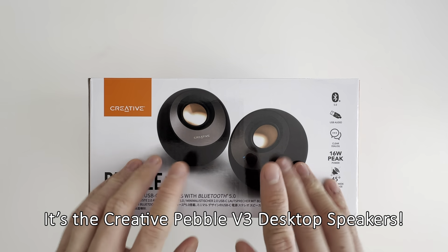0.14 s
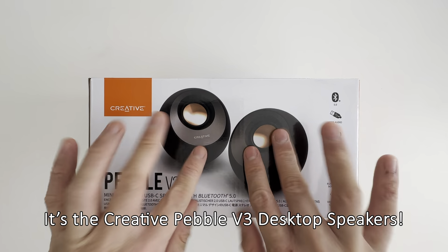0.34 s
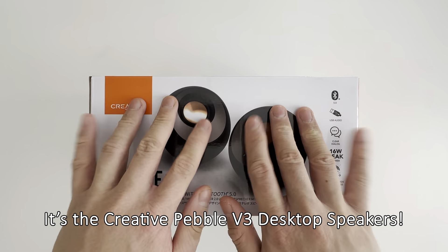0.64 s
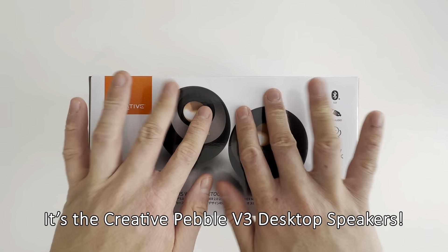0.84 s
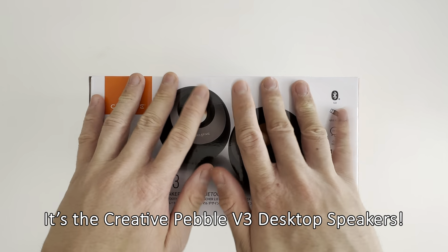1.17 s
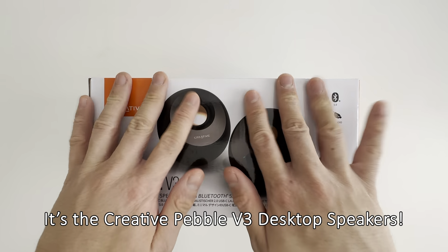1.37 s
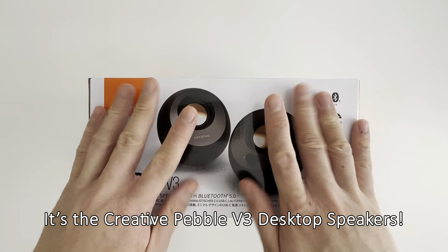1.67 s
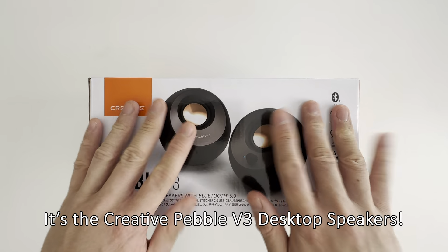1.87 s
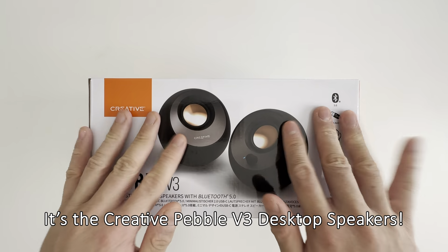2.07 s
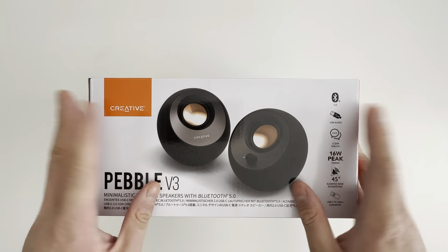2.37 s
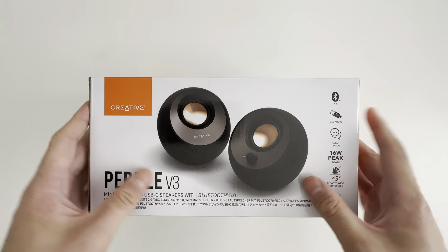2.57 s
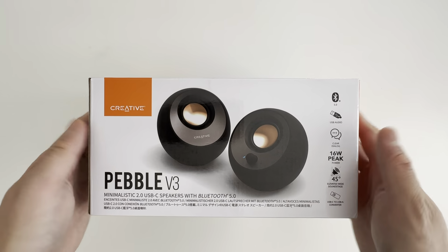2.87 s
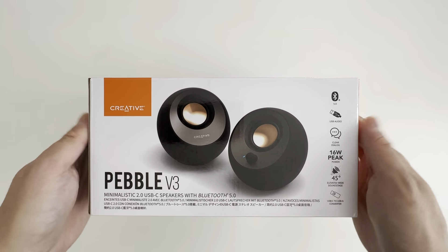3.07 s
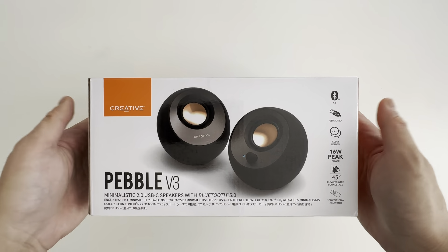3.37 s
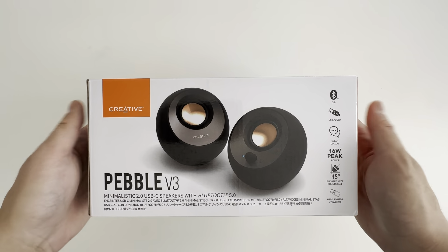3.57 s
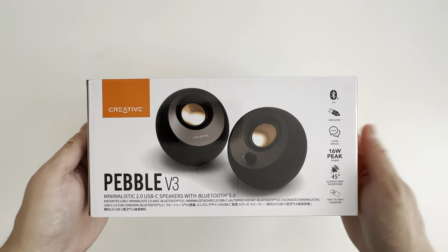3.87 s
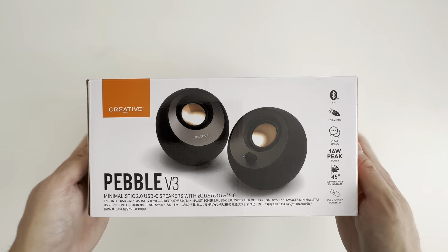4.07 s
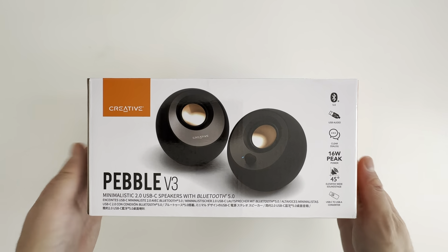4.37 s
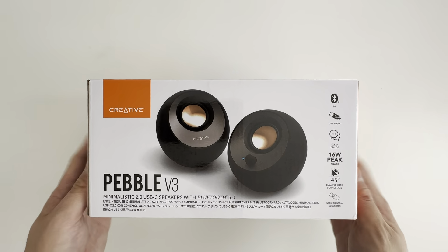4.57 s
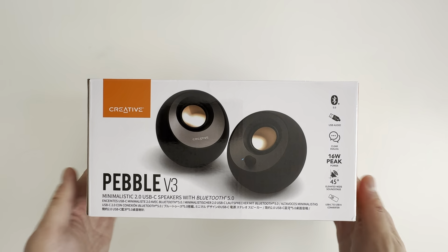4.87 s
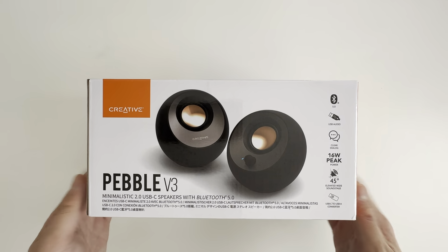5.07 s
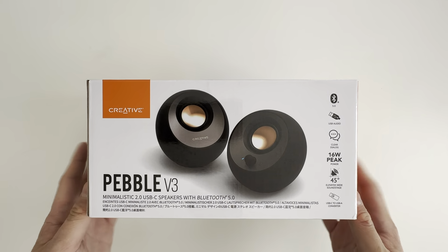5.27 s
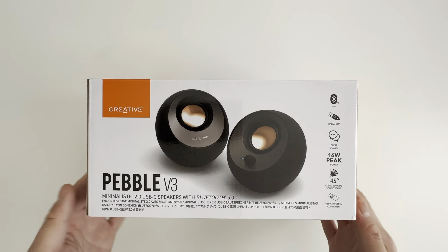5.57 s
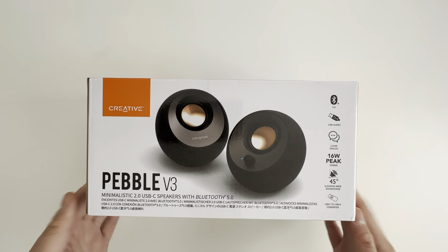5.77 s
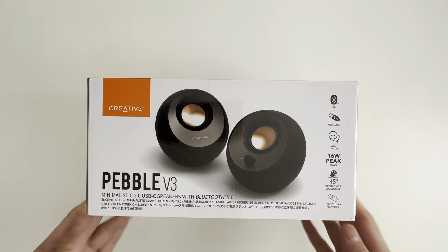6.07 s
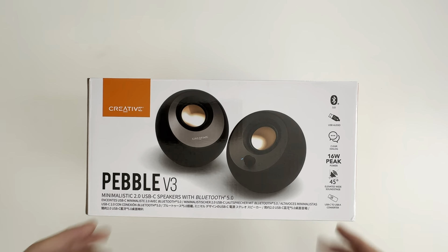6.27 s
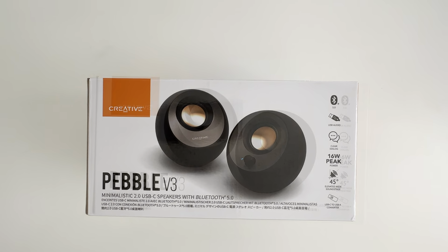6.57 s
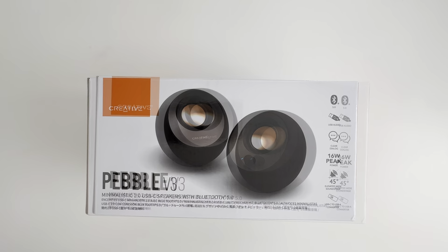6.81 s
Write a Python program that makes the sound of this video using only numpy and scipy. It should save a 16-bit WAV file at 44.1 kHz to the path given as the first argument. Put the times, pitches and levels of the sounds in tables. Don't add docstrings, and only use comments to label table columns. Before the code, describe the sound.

Fingertips of both hands drum rapidly and unevenly on a cardboard box, hollow low thumps easing into lighter, higher pats on its ends.

```python
import sys
import numpy as np
from scipy import signal
from scipy.fft import rfft, irfft, next_fast_len
from scipy.io import wavfile
from scipy.ndimage import map_coordinates

SR = 44100
rng = np.random.default_rng(int(sys.argv[2]) if len(sys.argv) > 2 else 0)


def boost(x):
    u = np.asarray(x, float) / 20
    return 10 ** u


def digitize_waveform(pressure):
    field = np.atleast_2d(pressure).T
    bounded = np.clip(field, -1, 1)
    quanta = np.round(bounded * 32767).astype(np.int16)
    wavfile.write(sys.argv[1], SR, quanta)


N = 306054
SPAN = next_fast_len(N + SR // 2)
HZ = np.fft.rfftfreq(SPAN, 1 / SR)
CLOCK = np.arange(N) / SR
T = np.arange(int(.13 * SR)) / SR


def on_log(table):
    hz, value = np.transpose(table)
    return np.interp(np.log(HZ + 1), np.log(hz), value)


def shaped(x, gain):
    return irfft(rfft(x, SPAN) * gain, SPAN)[..., :N]


def bell(hz, width_hz):
    return 1 / (1 + (2 * (HZ - hz) / width_hz) ** 2)


def decay(t, t60):
    return np.exp(-np.log(1000) * t / t60)


# frequency in Hz, level in dB per Hz.
AIR_SPECTRUM = [(41, -19.5), (70, -4.5), (97, -17.5), (113, -14.5), (183, -26), (680, -41.5), (1310, -37.5),
                (1780, -44), (2210, -32), (2750, -47.5), (6000, -47.5), (7200, -41), (7900, -43.5),
                (9400, -47.5), (10300, -59.5), (13200, -57.5)]


def air(level_db=-68.5, fan_hz=85, fan_db=-85):
    gain = boost(on_log(AIR_SPECTRUM)) / (1 + (HZ / 14300) ** 60)
    apart = np.clip(HZ / 300, .25, 1.1)
    mid, side = rng.standard_normal((2, N))
    mid, side = shaped(mid, gain), shaped(side, gain * apart)
    noise = np.array([mid + side, mid - side]) / mid.std()
    return boost(level_db + 1.5) * noise + boost(fan_db) * np.sin(2 * np.pi * fan_hz * CLOCK)


# time in seconds, level in dB.
TABLE_HUM_LEVEL = [
    (0, -46),
    (.2, -54.5),
    (.5, -44.5),
    (1.2, -53.5),
    (2.3, -49),
    (2.7, -55),
    (3.6, -65.5),
    (5.9, -58),
    (6.4, -71.5),
]


def table_top(notes, mode_hz=57, width_hz=11, struck_db=-12):
    mode = 1 / (1 + 2j * (HZ - mode_hz) / width_hz)
    hum = shaped(rng.standard_normal((2, N)), mode ** 2)
    hum = (hum[0] + 0.17 * np.array([hum[1], -hum[1]])) / hum.std()
    s, db = np.transpose(TABLE_HUM_LEVEL)
    port_db = np.array([[-1.5], [1.5]])
    push = notes ** 2 / (np.abs(notes) + 0.011)
    return shaped(push, mode ** 2 * boost(struck_db)) + hum * boost(np.interp(CLOCK, s, db) + port_db)


def panel_note(hz, hold_s, air_db, air_hz, rise_s, sag_s, sag, sweep_s):
    pitch = hz * (1 + sag * np.exp(-T / sag_s)) + 2600 * np.exp(-T / sweep_s)
    ring = (1 - np.exp(-T / rise_s)) ** 2 * decay(T, 0.1)
    damping = 0.11 + 0.81 / (1 + np.exp(np.clip((T - hold_s) / 0.0007, -50, 50)))
    panel = ring * damping * np.sin(2 * np.pi * np.cumsum(pitch) / SR)
    boom = (1 - np.exp(-T / 0.0063)) ** 2 * decay(T, 0.079) * np.sin(2 * np.pi * air_hz * T)
    return panel + boost(air_db) * boom


def burst(rise_s, fast_s, slow_s, slow_db):
    return (1 - np.exp(-T / rise_s)) * (np.exp(-T / fast_s) + boost(slow_db) * np.exp(-T / slow_s))


def spot(noise, hz):
    return noise + 1.55 * signal.lfilter(*signal.iirpeak(hz, 4, SR), noise)


def landings(spots, settle, widen):
    rows = []
    for strokes, places in spots:
        for (s, knock_db, panel_db, click_db), (hz, ring_hz, pan_db) in zip(strokes, places):
            rows.append((s, knock_db, panel_db, settle * hz, click_db, widen * pan_db, ring_hz))
    return rows


def taps(rows, sag, sweep_s, push_s, sag_s, hold_s, note_db, air_db, air_hz, rattle_db, skin_db,
         lag_s, lag_s_per_db, alike=0.21):
    layers = np.zeros((3, 2, N + 2 * len(T)))
    knock_shape = burst(0.00083, 0.0018, 0.024, rattle_db)
    click_shape = burst(0.00069, 0.0013, 0.029, skin_db)
    contact = 1.02 * np.exp(-((T - 0.0007) / 0.00004) ** 2)
    for s, knock_db, panel_db, hz, click_db, pan_db, spot_hz in rows:
        noise = rng.standard_normal((4, len(T)))
        soft = (200 / hz) ** 0.704
        rise_s = push_s * soft * boost(0.069 * np.clip(panel_db - knock_db, -10, 12))
        held_s = hold_s * soft * boost(1.8 * noise[0, 0])
        boom_hz = air_hz * boost(1.2 * noise[3, 0])
        note = panel_note(hz, held_s, air_db, boom_hz, rise_s, sag_s, sag, sweep_s)
        bloom_s = 0.009 * max(soft - 1, 0) * np.clip((-14 - panel_db) / 7, 0, 1)
        note = np.roll(note, int(SR * bloom_s))
        jerks = np.repeat(noise[2, :len(T) // 100 + 1], 100)[:len(T)]
        lumps = boost(3.5 * jerks * (T > .004))
        lag = lag_s - lag_s_per_db * pan_db
        together = slice(int(s * SR), int(s * SR) + len(T))
        for port, sign in enumerate((1, -1)):
            start = int((s + max(sign * lag, 0)) * SR)
            here = slice(start, start + len(T))
            near = boost(min(sign * pan_db, 0))
            grain = np.sqrt(alike) * noise[0] + np.sqrt(1 - alike) * noise[1 + port] + contact
            skin = noise[3] + .5 * noise[1 + port]
            layers[0, port, here] += near * boost(panel_db + note_db) * note
            layers[1, port, here] += near * boost(knock_db) * knock_shape * lumps * spot(grain, spot_hz)
            layers[2, port, together] += boost(click_db + sign * pan_db / 4) * click_shape * lumps * skin
    return layers[:, :, :N]


# start in seconds, knock peak in dB, panel note in dB, skin click in dB.
LID_RIM_TAPS = [(.32, -24.5, -16.5, -41.5), (.57, -26, -15, -36), (.585, -14, -21, -34.5),
                (.812, -20.5, -19, -36), (.825, -11, -16, -58), (1.065, -25.5, -19, -34.5),
                (1.078, -12.5, -21, -37), (1.148, -25, -62, -40), (1.317, -13, -51.5, -49.5),
                (1.327, -29, -61, -53), (1.553, -13, -18.5, -35), (2.226, -12.5, -16, -32.5),
                (2.323, -25.5, -59, -53), (2.401, -23.5, -61, -53)]
LID_RIGHT_TAPS = [(.025, -24, -18, -45.5), (.076, -16.5, -19.5, -39), (.527, -55, -30, -62.5),
                  (.605, -25, -29, -62), (.851, -38, -46, -64), (.869, -26.5, -34.5, -48),
                  (.905, -17.5, -17.5, -42), (1.001, -26.5, -28, -51.5), (1.167, -19.5, -21, -70),
                  (1.198, -20, -24, -41), (1.343, -34, -24.5, -46), (1.401, -29, -22.5, -49),
                  (1.433, -27.5, -28, -53.5), (1.469, -27.5, -20.5, -63), (1.591, -21.5, -24, -57),
                  (1.634, -19, -18.5, -38.5), (1.818, -16, -18.5, -51), (1.944, -20.5, -23, -38),
                  (2.057, -18.5, -26.5, -38.5), (2.095, -20.5, -22.5, -48), (2.166, -20.5, -19.5, -34),
                  (2.176, -32, -43, -51), (2.244, -8, -18.5, -43), (2.276, -31, -36, -77),
                  (2.39, -23, -25, -40.5)]
LID_MIDDLE_TAPS = [(.003, -26, -40, -55), (.238, -42, -64, -51.5), (.361, -16.5, -18.5, -40),
                   (.4, -18.5, -18, -37), (.437, -11.5, -27.5, -48), (.495, -16, -47.5, -54),
                   (.505, -44, -22.5, -39), (.649, -21.5, -30, -40.5), (.687, -21, -25, -37.5),
                   (.734, -20, -19.5, -41), (.939, -21, -23, -40), (.985, -20, -19, -37.5),
                   (1.228, -26, -26, -45), (1.256, -23, -20, -42.5), (1.309, -17.5, -18.5, -30.5),
                   (1.58, -30, -27, -33.5), (1.712, -24, -17.5, -45), (1.785, -8.5, -13, -29.5),
                   (1.859, -21.5, -17, -54.5), (1.915, -22, -24.5, -34.5), (2.003, -10, -10.5, -31.5),
                   (2.136, -25, -58, -42.5)]
LID_LEFT_TAPS = [(.058, -26, -23.5, -44), (.114, -20, -45, -39.5), (.259, -38, -37, -45),
                 (.418, -14.5, -25, -71.5), (1.11, -22.5, -25, -33), (1.457, -12, -17.5, -33.5),
                 (1.697, -16.5, -18, -31.5), (1.803, -13.5, -18, -29.5), (2.038, -21.5, -28, -46),
                 (2.153, -17, -22.5, -37.5), (2.253, -16, -38, -34), (2.349, -28, -26, -36)]
# panel note in Hz, ring of the struck spot in Hz, left minus right in dB.
LID_RIM_PLACES = [(242, 860, -7), (233, 620, -7.0), (233.6, 700, -4.5), (223, 680, 3), (235, 540, -7),
                  (208, 580, -6), (235, 3900, -5.5), (263, 1600, -4), (179, 1300, -4.5), (220, 990, -17.5),
                  (230, 1270, -2.5), (214, 440, -0.5), (215, 1400, 2.5), (230, 2100, -2)]
LID_RIGHT_PLACES = [(161, 610, -9), (155.5, 560, -7), (153, 1140, -4.5), (162, 1600, -18),
                    (135, 1100, -9.5), (191, 1360, -1), (130, 1100, -6), (169, 1500, -6.5),
                    (156.6, 203, -8), (176, 440, -8), (175, 1300, -9.5), (163.3, 400, -7.5),
                    (177, 1500, -3.5), (159, 1340, -2), (180.2, 3100, -7.5), (169, 410, -7),
                    (162, 1200, -4), (167, 1200, -4.5), (156, 430, -8.5), (161, 5000, -7.5),
                    (167, 530, -7.5), (126, 1340, -7), (164, 630, -10), (166.4, 710, -13),
                    (155, 1400, -6.5)]
LID_MIDDLE_PLACES = [(178, 1170, -4), (156, 1100, 0), (173.3, 620, -8), (138, 710, -6), (154, 800, -8),
                     (126.2, 1440, -12), (165, 1600, -8), (198, 1100, -2.5), (178.4, 1230, -5),
                     (142.4, 180, -8.5), (170.4, 5500, -11.5), (156.6, 670, -4), (151.4, 440, -5),
                     (163, 610, -4), (163, 1800, -3), (156, 1000, -5), (165, 3500, -11.5), (187, 580, -5),
                     (167, 2000, -6.5), (162, 1600, -6), (163.7, 1200, -2), (173.5, 2600, 3)]
LID_LEFT_PLACES = [(180, 540, -3), (202, 1220, -6), (154, 1000, -5.5), (200, 610, -7), (126, 1150, -9),
                   (141.2, 1300, -8), (161, 1200, -4), (163.5, 970, -10), (157, 1100, -1.5),
                   (153, 1440, -2), (129, 1900, 2.5), (161, 2200, 0.5)]


def lid_taps():
    spots = [(LID_RIM_TAPS, LID_RIM_PLACES), (LID_RIGHT_TAPS, LID_RIGHT_PLACES),
             (LID_MIDDLE_TAPS, LID_MIDDLE_PLACES), (LID_LEFT_TAPS, LID_LEFT_PLACES)]
    return taps(landings(spots, settle=0.881, widen=0.91),
                sag=0.9, sweep_s=0.00128, push_s=0.0029, sag_s=0.0035, hold_s=0.011,
                note_db=5.0, air_db=-7, air_hz=122.4, rattle_db=-17.0, skin_db=-23.5,
                lag_s=0.00036, lag_s_per_db=.00001)


# frequency in Hz, gain in dB.
CARD_SPECTRUM = [(200, 8.5), (400, 4), (600, 5.5), (1500, 6), (2400, -2), (6000, -8.5), (9300, 0.5),
                 (10100, -12.5), (12500, -23.5), (15500, -15.5)]
# frequency in Hz, width in Hz, height in dB.
CARD_RESONANCES = [(833, 46, 3.5), (1183, 43, 4), (1368, 44, 3.5), (8090, 2040, -13.5)]
PORT_TURNS_HZ = 8600, 10300, 14000
PORT_TURN = sum(np.pi / 2 + np.arctan((HZ - hz) / 150) for hz in PORT_TURNS_HZ)


def card(layers, knock_db=-4, click_db=16.5, split_hz=5500):
    notes, knocks, clicks = layers
    colour = on_log(CARD_SPECTRUM) + sum(db * bell(hz, width) for hz, width, db in CARD_RESONANCES)
    low = 1 / np.sqrt(1 + (HZ / split_hz) ** 6)
    high = np.sqrt(1 - low ** 2)
    ports = np.array([np.ones_like(HZ), boost(-5.5) * np.exp(-1j * PORT_TURN)])
    knock = shaped(knocks, boost(colour + knock_db) * low)
    click = shaped(clicks, boost(colour + click_db) * high * ports)
    return notes + knock + click


# frequency in Hz, decay time T60 in seconds.
ROOM_DECAY = [(100, 0.78), (400, 0.19), (1500, 0.31), (5000, 0.38), (16000, 0.052)]
# frequency in Hz, level in dB.
ROOM_TINT = [(100, -1.5), (400, 8), (1500, -3.5), (5000, -1), (16000, 9)]


def room(x, wet_db=-33, first_s=0.000066):
    t = np.arange(SR // 2) / SR
    onset = 1 - np.exp(-t / first_s)
    decay_hz, decay_s = np.transpose(ROOM_DECAY)
    tail = 0
    for hz in 60 * 2 ** np.arange(0, 8.5, .5):
        band = np.exp(-.5 * (np.log2((HZ + 1) / hz) / .25) ** 2)
        t60 = np.interp(np.log(hz), np.log(decay_hz), decay_s)
        noise = rng.standard_normal((3, len(t)))
        apart = min(hz / 870.0, 1)
        pair = np.sqrt(1 - apart) * noise[0] + np.sqrt(apart) * noise[1:]
        tail = tail + band * rfft(pair * onset * decay(t, t60), SPAN)
    return shaped(x.mean(0), tail * boost(on_log(ROOM_TINT) + wet_db))


def stirred(tail, stir_s=.0008, stir_hz=.6):
    i = np.arange(N)
    late = stir_s * SR * np.sin(np.pi * stir_hz * i / SR) ** 2
    return np.array([map_coordinates(port, [i - late], mode="nearest") for port in tail])


# start in seconds, level in dB.
NAIL_TICKS = [(0.4366, -29.5), (0.4938, -40.5), (0.5227, -42), (0.902, -35), (1.1026, -37.5),
              (1.164, -46.5), (1.3966, -42.5), (1.555, -36.5), (1.604, -40), (1.712, -33), (1.8193, -43),
              (1.8284, -43.5), (2.4004, -37.5), (4.8853, -33), (3.024, -46.5), (3.3337, -29), (3.3727, -33),
              (3.6314, -38), (4.9046, -40.5), (5.1362, -38.5), (5.391, -37), (5.465, -62), (6.0166, -42.5)]
# start in seconds, level in dB.
MORE_NAIL_TICKS = [
    (.4184, -41),
    (1.1893, -41.5),
    (1.791, -27.5),
    (4.467, -38),
]


def nails(tick_db=1, low_hz=1500, fall_hz=4800, alike=0.94):
    out = np.zeros((2, N + len(T)))
    shape = burst(0.0001, 0.0008, 0.006, -24.0)
    for s, db in list(NAIL_TICKS) + list(MORE_NAIL_TICKS):
        noise = rng.standard_normal((3, len(T)))
        start = int(s * SR)
        out[:, start:start + len(T)] += boost(db + tick_db) * shape * (alike * noise[0] + noise[1:])
    rise = 1 + (low_hz / (HZ + 1)) ** 4
    fall = 1 + (HZ / fall_hz) ** 4
    return shaped(out[:, :N], 2 / np.sqrt(rise * fall))


def rub(at_s=2.385, length_s=.025, hz=4600, level_db=-50):
    band = np.exp(-.5 * (np.log2((HZ + 1) / hz) / 0.64) ** 2)
    hiss = shaped(rng.standard_normal((2, N)), band)
    stroke = np.exp(-.5 * ((CLOCK - at_s) / length_s) ** 2)
    return boost(level_db) * hiss / hiss.std() * stroke


# start in
# seconds, knock peak in dB, panel note in dB, skin click in dB.
END_SLACK_TAPS = [(2.519, -28.5, -27, -41.5), (2.551, -30.5, -44.5, -58), (2.557, -33, -28, -51),
                  (2.723, -26.5, -35.5, -39), (2.792, -37, -50, -67), (2.811, -52.5, -58.5, -46.5),
                  (2.876, -25, -27.5, -44.5), (3.014, -41, -39.5, -49), (3.148, -22, -25.5, -49.5),
                  (3.412, -22, -17.5, -52), (3.952, -26.5, -36, -41.5), (4.292, -28.5, -33, -43.5),
                  (4.683, -22, -33, -44), (4.752, -29, -39.5, -44.5), (4.771, -29.5, -34.5, -41.5),
                  (4.983, -24.5, -37, -35.5), (5.131, -24.5, -34, -39), (5.225, -32.5, -39.5, -41),
                  (5.249, -39, -43, -47), (5.466, -34, -36, -40), (5.673, -32.5, -36.5, -38.5)]
END_RIGHT_TAPS = [(2.488, -33, -36.5, -67), (2.605, -25.5, -23.5, -42.5), (2.902, -14.5, -13.5, -41.5),
                  (2.924, -23, -20, -41), (2.931, -54, -22, -47.5), (3.133, -24.5, -30, -50),
                  (3.179, -18.5, -17.5, -49), (3.21, -31, -21.5, -40), (3.345, -24.5, -62, -38),
                  (3.373, -18.5, -23.5, -36), (3.635, -21.5, -20.5, -37), (3.654, -34, -26.5, -49.5),
                  (3.804, -22.5, -31.5, -36), (3.851, -34.5, -37, -59), (4.121, -28, -37.5, -53.5),
                  (4.164, -27, -40, -47), (4.217, -29.5, -24, -51), (4.379, -22.5, -23, -51),
                  (4.396, -25.5, -26, -66), (4.613, -19.5, -22.5, -52), (4.656, -22.5, -32, -38),
                  (4.892, -23.5, -27.5, -40), (4.906, -21.5, -50, -45), (4.927, -61, -37, -64),
                  (5.164, -27.5, -27, -41.5), (5.391, -29, -28, -54.5), (6.025, -29, -73, -49.5)]
END_LEFT_TAPS = [(3.331, -22, -25.5, -40), (3.467, -23.5, -34.5, -37), (3.826, -36, -45, -44.5),
                 (3.937, -27.5, -28, -52), (4.13, -41, -35, -56), (4.172, -25.5, -27.5, -48.5),
                 (4.52, -24, -34, -43), (4.626, -24.5, -26, -39.5), (4.664, -21, -35, -45),
                 (4.852, -23.5, -20.5, -37), (5.095, -21.5, -21, -38), (5.335, -22.5, -29.5, -42),
                 (5.6, -26.5, -41, -49), (5.786, -26.5, -31.5, -50.5)]
END_OTHER_TAPS = [(2.63, -19.5, -21, -47), (2.886, -20, -23, -41), (3.078, -21, -24, -49.5),
                  (3.09, -31, -34, -41.5), (3.163, -16, -20.5, -42.5), (3.244, -28.5, -33, -42.5),
                  (3.396, -21, -26, -44.5), (3.448, -28, -26.5, -52.5), (3.479, -33, -34, -53.5),
                  (3.562, -18, -27, -42.5), (3.607, -21, -24.5, -48.5), (3.686, -24.5, -30, -55),
                  (3.7, -39, -34, -38), (3.906, -29.5, -38.5, -55), (4.276, -32.5, -32, -46.5),
                  (4.423, -21.5, -29, -51.5), (4.445, -19, -31, -41), (4.865, -19.5, -21.5, -63),
                  (5.116, -24.5, -31.5, -50.5), (5.15, -25.5, -33, -52), (5.324, -26, -30, -44.5),
                  (5.363, -27.5, -31.5, -54.5), (5.571, -24.5, -31, -45.5), (5.582, -36, -30, -48.5),
                  (5.64, -34, -33.5, -45.5), (5.799, -24.5, -31.5, -39.5), (5.842, -34.5, -41, -48.5),
                  (6.017, -32.5, -40.5, -58.5), (6.052, -42, -53, -42)]
# panel note in Hz, ring of the struck spot in Hz, left minus right in dB.
END_SLACK_PLACES = [(180, 900, 2), (242, 790, 1.5), (230, 1200, -6.5), (223, 1300, -3), (184, 2000, -6.5),
                    (180, 3560, -11), (300, 470, -0.5), (245, 1400, -1), (185, 910, 3.5), (304, 630, -3),
                    (255, 1100, -4.5), (267, 1000, -2), (224, 730, -4.5), (183, 1100, -0.5),
                    (237, 960, -2.5), (183, 1550, 1.5), (290, 1220, -5), (195, 830, 4.5), (200, 930, -11.5),
                    (210, 1430, -2), (203, 1500, 4)]
END_RIGHT_PLACES = [(230, 850, -4.5), (284, 930, -1.5), (325, 950, -4.5), (314, 520, -2), (326, 1430, -7),
                    (276, 218, -3.5), (330, 410, -5), (320, 350, -4.5), (354, 2200, -7.5),
                    (295, 870, -10.5), (314, 320, -4), (314, 660, -2), (292, 960, -0.5), (258, 560, -0.5),
                    (280, 820, -1), (425, 1200, -10), (281, 460, -1), (313, 1000, 0), (344, 1600, -5),
                    (295.6, 560, -3.5), (300, 290, 5.5), (280, 810, -4), (290, 2100, -3), (350, 2000, -4),
                    (297, 2200, -5), (286, 1640, -1), (271, 1730, 1)]
END_LEFT_PLACES = [(315, 1080, -1.5), (182, 1640, -3), (308, 5000, 0), (298, 2260, 9.5), (316, 1300, 6.5),
                   (316, 820, 3), (180, 1270, -3), (330, 2000, -0.5), (175, 1500, -2.5), (345, 870, 7),
                   (320, 1960, 2.5), (298, 740, 2.5), (182, 2200, -1.5), (314, 840, 6.5)]
END_OTHER_PLACES = [(306, 350, -5.5), (273, 640, 5.5), (250, 896, -3.5), (340, 630, -3), (297, 570, 9.5),
                    (184, 800, -4), (295, 190, 6), (310, 340, -2), (371, 2400, -2), (334, 970, -3.5),
                    (294, 470, 2), (282, 600, -5), (350, 1000, -4.5), (315, 230, -2.5), (305, 1260, -3),
                    (272, 640, -0.5), (273, 2060, -1.5), (300, 1000, -4), (370, 800, 1.5), (427, 1330, -1.5),
                    (285, 2100, 2.5), (282, 1010, 0.5), (290, 1600, -2), (321, 1900, 6), (274, 550, -0.5),
                    (302, 2400, -3), (278, 1020, 2), (284, 1560, -1), (280, 1180, -7.5)]


def end_taps():
    spots = [(END_SLACK_TAPS, END_SLACK_PLACES), (END_RIGHT_TAPS, END_RIGHT_PLACES),
             (END_LEFT_TAPS, END_LEFT_PLACES), (END_OTHER_TAPS, END_OTHER_PLACES)]
    return taps(landings(spots, settle=0.95, widen=1.25),
                sag=0.47, sweep_s=0.000901, push_s=0.0018, sag_s=0.0023, hold_s=0.017,
                note_db=2.5, air_db=-8, air_hz=141.0, rattle_db=-7.5, skin_db=-19,
                lag_s=0.00028, lag_s_per_db=.00003)


def scene():
    lid, ends = lid_taps(), end_taps()
    box = card(lid + ends) + nails() + rub()
    far = box - .85 * (lid[0] + ends[0])
    table = table_top(lid[0] + boost(-10.0) * ends[0])
    return air() + table + box + stirred(room(far))


# frequency in Hz, width in Hz, depth in dB.
TREBLE_DIPS = [(5300, 100, -10), (7700, 200, -14), (10150, 260, -14)]
PORT_TILT = 640, 430, -3


def shared_treble(x, right_db=-3, own=.4, shared_above_hz=10300, top_hz=15800, top_db=-8):
    left, right = rfft(x, SPAN)
    shared = (1 - own) / (1 + (shared_above_hz / (HZ + 1)) ** 30)
    leaked = boost(right_db) * np.exp(-1j * PORT_TURN) * left
    right = np.sqrt(1 - shared ** 2) * right + shared * leaked
    dips = sum(db * bell(hz, width) for hz, width, db in TREBLE_DIPS)
    tilt_hz, tilt_width_hz, tilt_db = PORT_TILT
    lean = boost(tilt_db / 2 * bell(tilt_hz, tilt_width_hz))
    pair = np.array([left * lean, right / lean])
    return irfft(pair * boost(dips + top_db * (HZ > top_hz)), SPAN)[:, :N]


def roll_off(x):
    return signal.sosfilt(signal.butter(12, 16510, fs=SR, output="sos"), x)


def record(dry):
    high_pass = signal.butter(4, 42, "high", fs=SR, output="sos")
    heard = signal.sosfilt(high_pass, shared_treble(dry))
    return roll_off(heard)


dry = scene()
out = record(dry)
digitize_waveform(out)
```